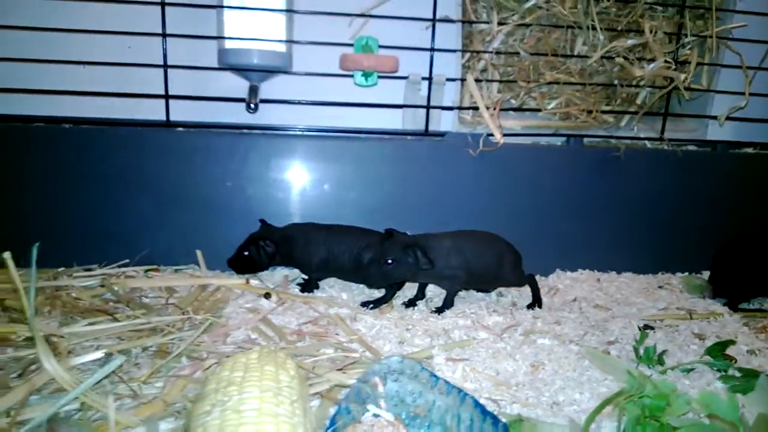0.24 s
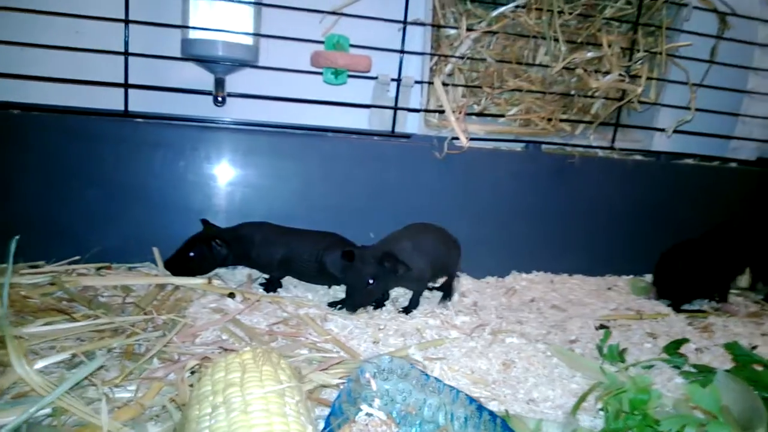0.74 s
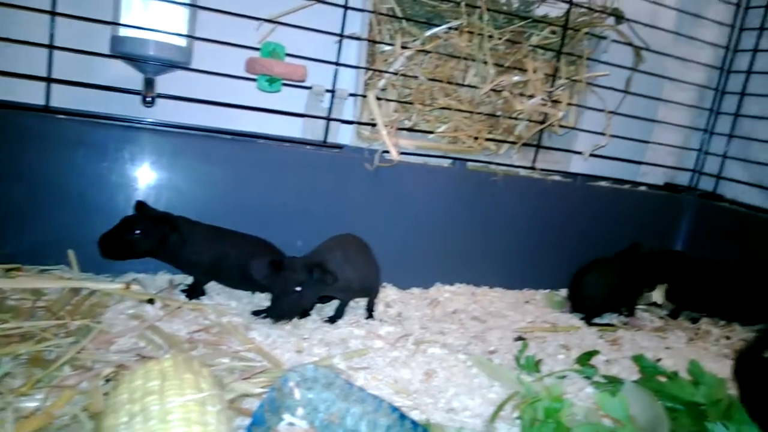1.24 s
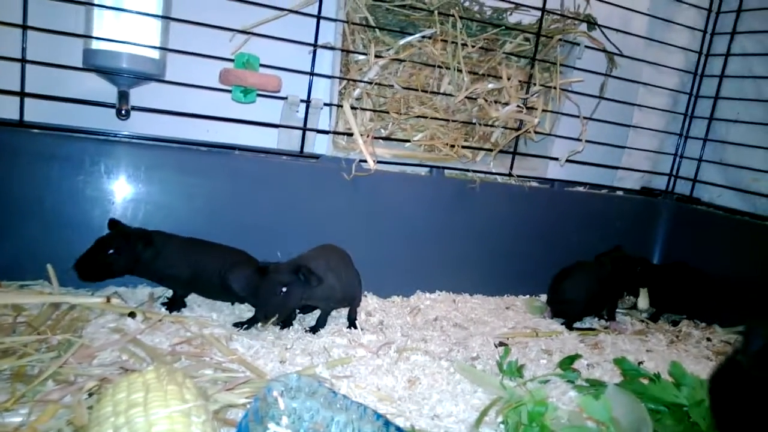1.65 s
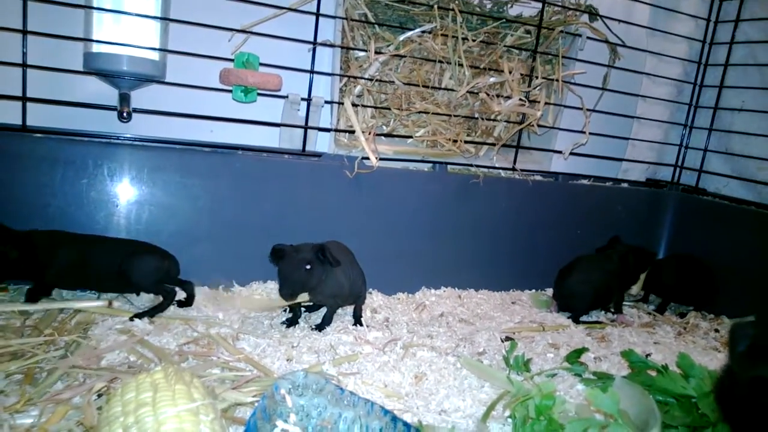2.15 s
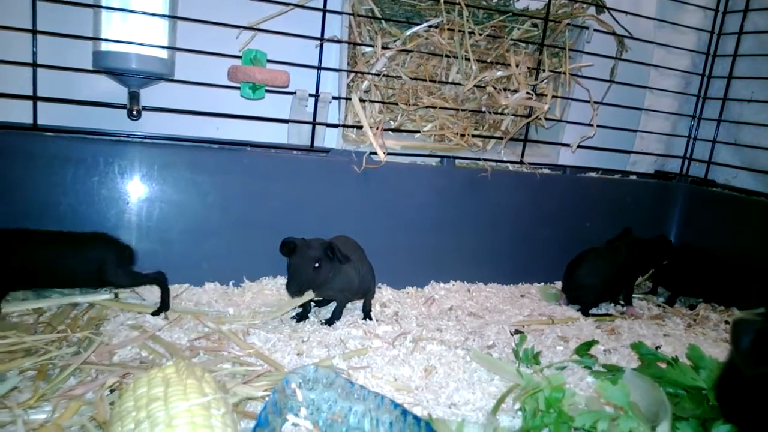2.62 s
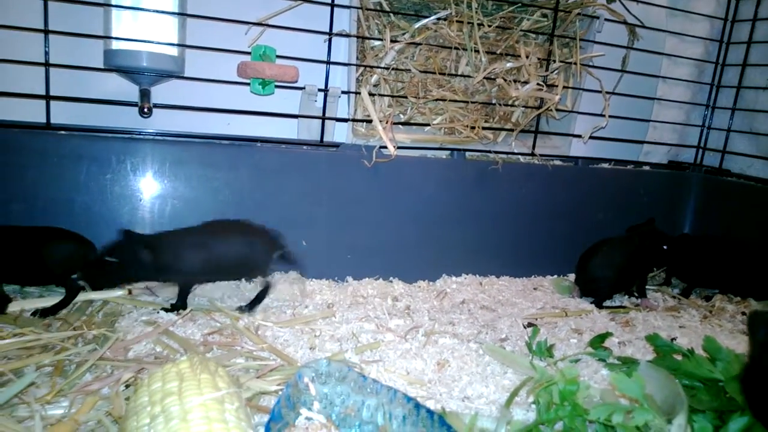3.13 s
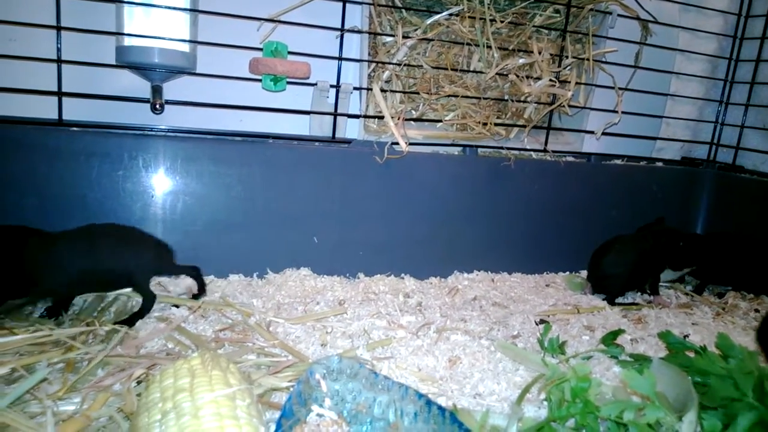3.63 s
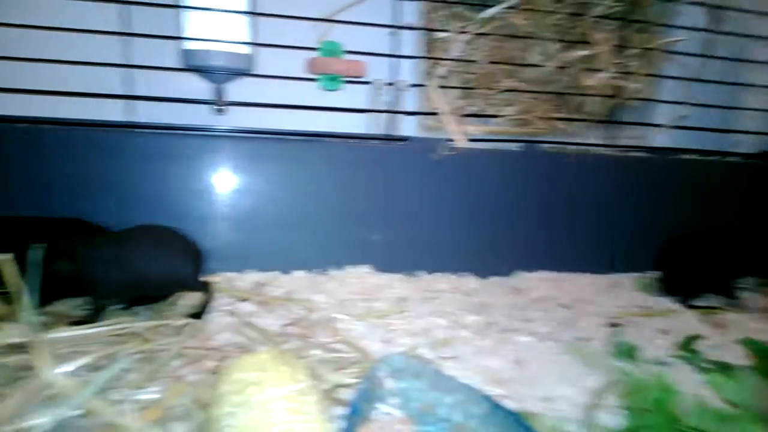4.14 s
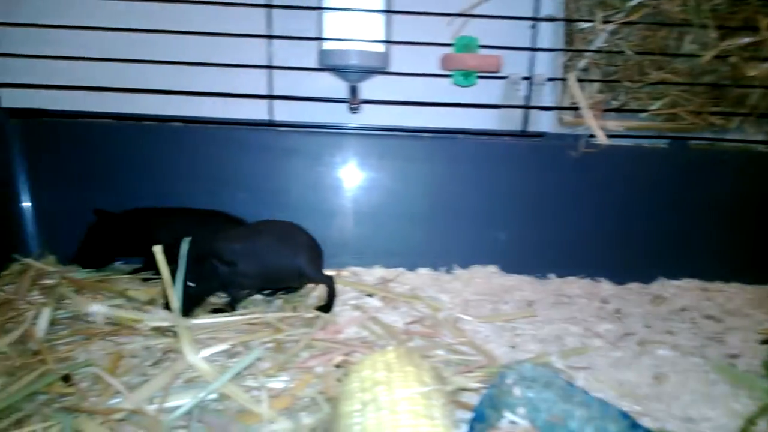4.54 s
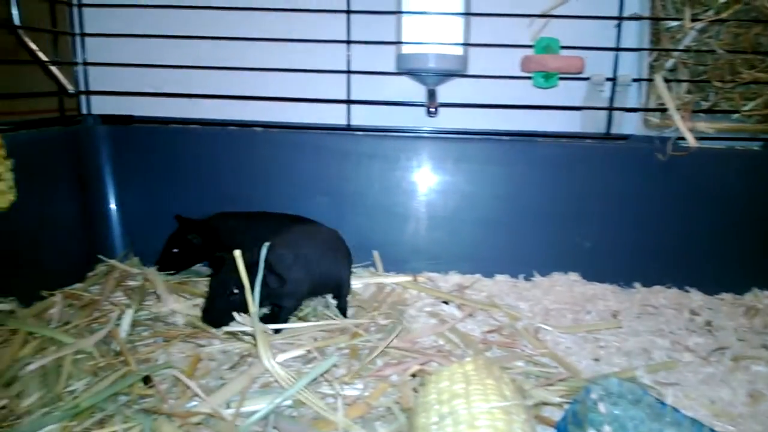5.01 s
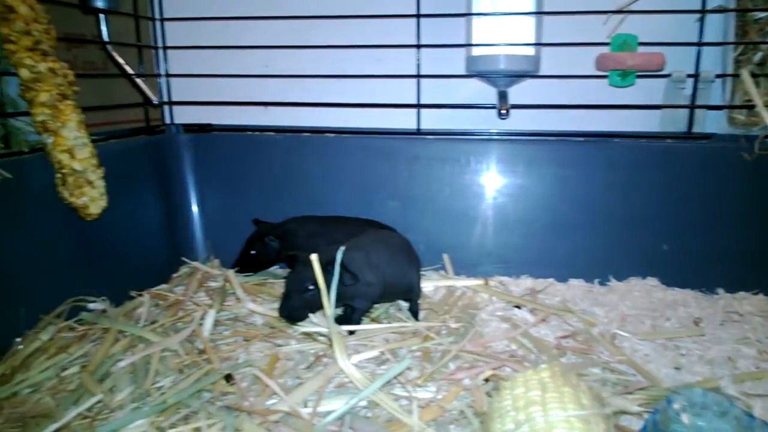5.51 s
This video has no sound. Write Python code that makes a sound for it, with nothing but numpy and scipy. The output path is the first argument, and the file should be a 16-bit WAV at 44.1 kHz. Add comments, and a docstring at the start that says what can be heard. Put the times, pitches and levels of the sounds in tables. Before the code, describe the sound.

Young guinea pigs chirp in quick runs of short, rising squeaks, with faint rustling and snapping hay over a low rumble.

```python
"""A plastic cage in a room with little echo, the microphone close to young guinea pigs. They potter about,
chutting in quick runs of short, rising chirps. Hay snaps and rustles under their feet. Behind them lies a
drone; at the microphone a small camera rumbles low as it is handled, and adds its hiss and whine. Now and then
the sound drops out for one to three milliseconds, which leaves small clicks."""
import sys
import numpy as np
from scipy import signal
from scipy.fft import rfft, irfft, next_fast_len
from scipy.io import wavfile

SR = 44100
rng = np.random.default_rng(int(sys.argv[2]) if len(sys.argv) > 2 else 0)


def dump(signal):
    """Clip the signal to [-1, 1] and save it as 16-bit WAV at the path in sys.argv[1]."""
    limited = np.clip(np.atleast_2d(signal).T, -1, 1)
    pcm = np.round(limited * 32767).astype(np.int16)
    wavfile.write(sys.argv[1], SR, pcm)


N = 254456

# The calls, one chirp a row; all levels are relative (start [s], length [s], held pitch [Hz],
# top of the flick [Hz], level [dB], swell from start to end [dB], overtones [dB], roughness [dB])
CHIRPS = [(0.199, 0.066, 752.5, 1008, -51.5, 10, -11, 0), (0.367, 0.063, 635, 831, -46.5, 3, -8, -14.5),
          (0.526, 0.065, 648.5, 973, -46, -4.5, -1.5, -6), (0.901, 0.051, 771, 960, -55, 7, -17, -5.5),
          (1.032, 0.065, 672, 960, -46, -8.5, -11.5, -7.5), (1.218, .067, 690, 1000, -53.5, 3, -34, -1.5),
          (1.455, 0.055, 749, 950, -55.5, 3, -23, -11), (1.619, 0.068, 632.4, 824, -50.5, 7.5, -17.5, -5.5),
          (1.796, 0.053, 611.5, 844, -41, -6.5, -14, -12.5), (1.939, .055, 615, 863, -40, 0.5, -21, -13.5),
          (2.097, .060, 609, 900, -44.5, 3.5, -25, -9), (2.299, 0.058, 642, 887, -47.5, 11.5, -34, -8.5),
          (2.444, 0.058, 663, 970, -40.5, 5.5, -22, -11.5), (2.592, 0.058, 686, 907, -40, -2, -14.5, -13.5),
          (2.742, 0.058, 670.6, 889, -39, 1, -15, -14.5),
          (2.897, 0.065, 650.6, 895, -41, 1.5, -12.5, -11.5), (3.136, 0.026, 493, 507, -49.5, 19, -37, -14),
          (3.182, 0.011, 790, 780, -57.5, 1, -27, -14), (3.272, .056, 634.5, 924, -41, 1.5, -14, -10),
          (3.413, 0.051, 597, 933, -38, 1.5, -16, -11), (3.586, .046, 671, 777, -46, 3, -15.5, -15.5),
          (3.759, 0.045, 696, 828, -47, 9, -28, -4.5), (3.887, .064, 617, 870, -40.5, 5, -15.5, -9.5),
          (4.541, 0.036, 1058, 1040, -51.5, 7, -28, -7.5),
          (4.558, 0.039, 672.4, 870, -47.5, 16.5, -17, -10), (4.719, 0.0536, 701, 863, -45.5, 9, -26, -4),
          (5.450, 0.025, 464, 616, -47, -1, -18, -7.5), (5.488, 0.014, 750, 736, -42, 11, -23, -11.5),
          (5.605, 0.052, 570.4, 854, -41, 5, -16, -11), (5.659, .017, 720, 720, -45.5, -2, -21, -7),
          (5.735, 0.06, 612, 800, -38, 18.5, -24.5, -13)]
# rasp with the mouth nearly shut, and what is added as it opens (frequency [Hz], gain [dB])
SHUT_RASP_SPECTRUM = [(250, -6.5), (450, -2.5), (650, -1), (1050, 1.5), (1300, -28), (1700, -8),
                      (2100, -17), (3000, -15)]
OPEN_RASP_SPECTRUM = [(500, -42), (1100, 5.5), (1400, -7), (1750, 1), (2100, -3.5), (3000, -6.5)]
# colour the mouth gives the voice (frequency [Hz], gain [dB])
MOUTH_RESPONSE = [(100, 4.5), (1200, 2), (1450, 2), (1700, -6), (2000, -9), (2600, -18.5), (3800, -12),
                  (6000, -28)]
# the clearest snapping stalks
# (time [s], level [dB], time to fall by 60 dB [s], knock against snap [dB], stalk pitch [ratio])
SNAPS = [(1.349, -65, 0.015, 11, 0.46), (1.540, -63, 0.016, -19, 1.2), (1.837, -53, 0.0095, 10, 0.91),
         (1.871, -52, 0.017, -4, 0.96), (1.883, -53, .01, -20, 1.3), (1.8886, -35.5, 0.011, -4, 1.01),
         (2.0119, -51.5, 0.0035, -21, 1.1), (2.031, -62, .03, -5, 1.1), (2.071, -55.5, 0.033, 7.5, .69),
         (2.3863, -61.5, 0.018, -14, 1.1), (2.951, -57, 0.063, 2, 0.84), (3.046, -61, 0.039, -5, 0.71),
         (3.35, -62, .029, -10, 0.86), (4.113, -59, 0.012, 15.5, 0.66), (5.011, -63, 0.12, -13, 0.59),
         (5.033, -65, 0.062, 8.5, 0.78), (5.227, -62.5, 0.12, 8.5, 0.23), (5.306, -56, .05, 2.5, 0.59),
         (5.427, -66, 0.034, -6, 0.97)]
# resonances of a dry stalk at pitch ratio 1 (frequency [Hz], width [Hz], gain [dB])
STALK_MODES = [(1060, 220, -19), (3700, 1400, -7), (5560, 660, -2), (7400, 210, 5), (8600, 600, 2),
               (11100, 2200, -26), (12700, 4900, -10)]
# a foot on the tray (frequency [Hz], gain [dB])
KNOCK_SPECTRUM = [(150, -31), (400, -0.5), (1000, -7), (1700, -16), (2800, -38), (8000, -68)]
# the animals shift about (busiest moment [s], half-length [s], shavings [dB], hay [dB])
SCUFFLES = [(1.35, 0.54, -67.5, -102), (1.994, 0.076, -60.5, -79), (2.562, 0.14, -67.5, -95),
            (3.493, 0.75, -67, -93), (4.94, 0.38, -64.5, -75), (5.264, 0.044, -62.5, -72),
            (5.48, 0.18, -56, -73.5)]
# pushed shavings and brushed hay (frequency [Hz], gain [dB])
SHAVINGS_SPECTRUM = [(120, -1.5), (180, 7.5), (250, 0.5), (340, 3.5), (500, -11.5), (1000, -11.5),
                     (1800, -22.5), (3000, -25.5), (8000, -35.5)]
HAY_SPECTRUM = [(200, 6), (500, -17.5), (1000, 6), (1600, 6), (2300, -12), (4500, -25), (8000, -32),
                (15000, -30)]
# broad rise and fall of the rumble (time [s], level [dB])
RUMBLE_LEVEL = [(0.0, -50), (0.11, -63), (0.26, -52), (0.48, -56.5), (1.59, -56.5), (2.97, -50),
                (3.16, -59), (3.26, -53), (3.57, -50.5), (3.74, -61.5), (4.13, -49.5), (4.26, -60),
                (4.6, -50.5), (4.63, -69), (4.72, -54), (5.22, -52.5), (5.3, -45), (5.77, -57.5)]
# colour of the rumble (frequency [Hz], gain [dB])
RUMBLE_SPECTRUM = [(10, -35.5), (27, -5), (37, 0.5), (50, 4.5), (68, -8), (90, -2), (140, -2.5), (175, -24),
                   (260, -28), (600, -55.5)]
# swells of the drone (loudest moment [s], half-length [s], level [dB])
DRONE_SWELLS = [(2.8, 0.16, -50.5), (3.52, 0.041, -49)]
# the camera's hiss (frequency [Hz], gain [dB])
HISS_SPECTRUM = [(200, -10), (500, 6), (1000, -0.5), (1600, -4), (2500, -8.5), (4400, -7.5), (6500, -11),
                 (8500, -15), (15800, -19)]
# tones of its electronics (frequency [Hz], level [dB])
WHINE_TONES = [(3621, -91.5), (4345, -90.5), (5069, -95.5), (5793, -92), (6518, -93.5), (7594, -101)]
# moments when the sound drops out (end time [s])
DROPOUT_ENDS = [.4237, .5737, .7237, 1.0537, 1.3537, 1.3637, 2.3137, 2.4737, 2.4937, 2.6337, 2.7937, 2.8237,
                2.9537, 3.2837, 3.2937, 3.4337, 3.4537, 3.5937, 3.6237, 3.9137, 3.9237, 4.0837, 4.1037,
                4.5837, 4.7237, 5.5137, 5.6937]


def chirps(jitter=0.0246, shimmer_db=0.92, attack_s=0.0029, release_s=0.0063, sag=0.89):
    """The main voices: vocal folds sound a rising note, and strain adds rasp and a half harmonic."""
    out = np.zeros(N)
    wobble, flutter, split = wander(112), wander(180), wander(97)
    shut_air, open_air = noise(SHUT_RASP_SPECTRUM), noise(OPEN_RASP_SPECTRUM)
    for chirp, start_cycle in zip(CHIRPS, rng.random(len(CHIRPS))):
        start, length, held_hz, flick_hz, level_db, swell_db, overtones_db, rough_db = chirp
        i = np.arange(int(start * SR), min(int((start + length) * SR), N))
        t = i / SR - start
        rough = amp(rough_db)
        moments, pitches = chirp_gesture(length, held_hz, flick_hz)
        hz = np.interp(t, [*moments, length], [*pitches, sag * pitches[-1]])
        hz *= 1 + jitter * (1 + 3 * rough) * wobble[i]
        phase = 2 * np.pi * (start_cycle + np.cumsum(hz) / SR)
        # the overtones come in as the folds close harder, toward the end of the hold
        closure = np.interp(t, moments, [0.4, 0.63, 1.83, 0.48])
        overtones = np.cos(2 * phase) + amp(-19) * np.cos(3 * phase) + amp(-4) * open_air[i]
        tone = np.cos(phase) + amp(overtones_db) * closure * overtones
        # strong and weak cycles alternate, which puts a line between the harmonics
        half_harmonic = amp(-9.5) * (0.8 + 0.6 * split[i]) * np.minimum(closure, 1) * np.cos(1.5 * phase)
        rasp = shut_air[i] * (1 + 0.21 * np.cos(phase))
        voice = np.sqrt(2) * (tone + rough * half_harmonic) + rough * rasp
        gate = np.clip(t / attack_s, 0, 1) * np.clip((length - t) / release_s, 0, 1)
        arch_db = np.interp(t, moments, [-2, 0, -0.5, 0.94])
        effort = amp(level_db + arch_db + swell_db * (t / length - 0.5) + shimmer_db * flutter[i])
        out[i] += gate * effort * voice / np.sqrt(1 + rough ** 2 / 2)
    return shape(np.pad(out, (0, SR)), MOUTH_RESPONSE)[:N]


def chirp_gesture(length, held_hz, flick_hz, scoop=0.8183, climb=0.017, scoop_share=0.2837):
    """A chirp scoops up, holds, then flicks: times and pitches at start, note, flick and its top."""
    blip_s, full_s = 0.01, 0.054  # a blip starts on the note; a full chirp makes the whole gesture
    flick_s, top_s = 0.01832, 0.0077  # before the end of a full chirp
    reach = np.clip((length - blip_s) / (full_s - blip_s), 0, 1)
    hurry = min(length / full_s, 1)
    moments = np.array([0, scoop_share * length, length - hurry * flick_s, length - hurry * top_s])
    bend = 1 + reach * np.array([scoop - 1, -climb, climb])
    return moments, [*(held_hz * bend), flick_hz]


def snaps(rise_share=0.11):
    """Stalks crack underfoot, each with a dull knock from the tray; the slower ones crush."""
    out, knock = np.zeros(N), noise(KNOCK_SPECTRUM)
    for time, level_db, t60, knock_db, pitch_ratio in SNAPS:
        peak = int(time * SR)
        i = np.arange(peak - SR // 100, min(peak + SR // 10, N))
        age = (i / SR - time) / t60  # in decay times
        force_db = -60 * np.maximum(age, -age / rise_share)
        crack = stalk_noise(pitch_ratio, len(i))
        out[i] += amp(level_db + force_db) * (crack + amp(knock_db) * knock[i])
    return out


def stalk_noise(pitch_ratio, size):
    """Noise through the resonances of a dry stalk; thinner stalks ring higher."""
    f = np.geomspace(100, 20000, 400)
    power = sum(amp(db) ** 2 / (1 + (2 * (f / pitch_ratio - hz) / width) ** 2)
                for hz, width, db in STALK_MODES)
    return noise(np.c_[f, 10 * np.log10(power)], size)


def bedding():
    """On the cage floor small feet push the shavings about, and bodies brush the hay."""
    times, half_lengths, shavings_db, hay_db = np.transpose(SCUFFLES)
    shavings_gain = swells(zip(times, half_lengths, shavings_db), idle_db=-67.5)
    hay_gain = swells(zip(times, half_lengths, hay_db), idle_db=-79)
    shavings = rustle(SHAVINGS_SPECTRUM, grains_per_s=500, patchy_db=3.0)
    hay = rustle(HAY_SPECTRUM, grains_per_s=640, patchy_db=0.5)
    return shavings_gain * shavings + hay_gain * hay


def rustle(spectrum, grains_per_s, patchy_db):
    """Many tiny slips over a soft rub, coming in clumps."""
    size, chance = rng.random((2, N))
    slips = unit(size ** 2 * (chance < grains_per_s / SR) * rng.standard_normal(N))
    rub = rng.standard_normal(N)
    clumps = amp(patchy_db * wander(34))
    return unit(shape(slips + rub, spectrum) * clumps)


def cage_and_room(direct, walls_db, tail_db, t60, echoes_per_s=3000):
    """The direct sound reaches the microphone first, then the cage walls, then a weak room tail."""
    t = np.arange(SR // 2) / SR
    walls, tail = rng.standard_normal((2, len(t))) * (rng.random((2, len(t))) < echoes_per_s / SR)
    walls *= (t > 0.002) * np.exp(-t / 0.014)
    tail *= (t > 0.008) * amp(-60 * t / t60)
    echo = amp(walls_db) * walls / np.linalg.norm(walls) + amp(tail_db) * tail / np.linalg.norm(tail)
    return direct + signal.fftconvolve(direct, echo)[:N]


def rumble(lumpy_db=1.0):
    """Handling of the camera makes a low noise at the microphone that rises and falls in lumps."""
    level_db = np.interp(np.arange(N) / SR, *np.transpose(RUMBLE_LEVEL))
    return amp(level_db + lumpy_db * wander(2.7)) * noise(RUMBLE_SPECTRUM)


def drone(pitch_hz=87.04, drift_hz=1.58):
    """A low, wavering tone swells twice within the rumble."""
    phase = 2 * np.pi * np.cumsum(pitch_hz + drift_hz * wander(9.7)) / SR
    return np.sqrt(2) * swells(DRONE_SWELLS, idle_db=-66) * np.sin(phase)


def camera_noise(hiss_db=-71.5):
    """Right at the microphone: the camera's steady hiss and the thin whine of its electronics."""
    t = np.arange(N) / SR
    whine = sum(amp(db) * np.sin(2 * np.pi * hz * t) for hz, db in WHINE_TONES)
    return np.sqrt(2) * whine + amp(hiss_db) * noise(HISS_SPECTRUM)


def amp(db):
    """Decibels to gain."""
    return 10 ** (np.asarray(db) / 20)


def unit(x):
    """Scales to rms 1."""
    return x / np.sqrt(np.mean(x ** 2) + 1e-20)


def shape(x, curve):
    """Filters x with a curve (frequency [Hz], gain [dB])."""
    hz, db = np.transpose(curve)
    size = next_fast_len(len(x), True)
    f = np.fft.rfftfreq(size, 1 / SR)
    gain = amp(np.interp(np.log(f + 1), np.log(hz + 1), db))
    return irfft(rfft(x, size) * gain, size)[:len(x)]


def noise(spectrum, size=N):
    """Steady noise of rms 1 with a spectrum (frequency [Hz], gain [dB])."""
    return unit(shape(rng.standard_normal(size), spectrum))


def wander(rate_hz):
    """Smooth random motion of rms 1, mostly slower than rate_hz."""
    size = next_fast_len(N, True)
    f = np.fft.rfftfreq(size, 1 / SR)
    lowpass = np.exp(-(f / rate_hz) ** 2)
    return unit(irfft(rfft(rng.standard_normal(size)) * lowpass, size)[:N])


def swells(rows, idle_db):
    """Gain of bell-shaped swells (time [s], half-length [s], level [dB]) over a steady level."""
    t = np.arange(N) / SR
    power = sum(amp(db) ** 2 * np.exp(-((t - time) / half) ** 2) for time, half, db in rows)
    return np.sqrt(amp(idle_db) ** 2 + power)


def scene(voice_db=-2.0):
    """One microphone at the cage: animals in front, background behind; the snaps leave little tail."""
    animals = cage_and_room(amp(voice_db) * chirps() + bedding(), walls_db=-14, tail_db=-15, t60=0.13)
    stalks = cage_and_room(snaps(), walls_db=-13, tail_db=-21, t60=0.12)
    return (animals + stalks + rumble() + drone() + camera_noise())[None]


def record(dry):
    """A stale scrap of earlier sound fills each dropout, with hard edges; the top treble is cut."""
    shortest_s, longest_s, stale_s, cutoff_hz = 0.00097, 0.0028, 0.08, 15900
    out = dry.copy()
    for end, length in zip(DROPOUT_ENDS, rng.uniform(shortest_s, longest_s, len(DROPOUT_ENDS))):
        i = np.arange(int((end - length) * SR), int(end * SR))
        out[:, i] = dry[:, i - int(stale_s * SR)]
    lowpass = signal.firwin(511, cutoff_hz, window=("kaiser", 7), fs=SR)
    return signal.oaconvolve(out, lowpass[None], "same")


dry = scene()
out = record(dry)
dump(out)
```